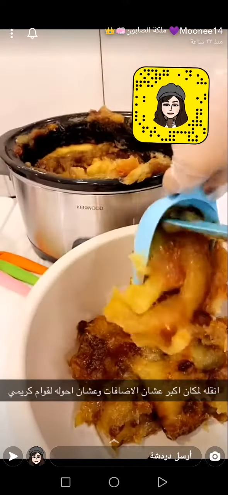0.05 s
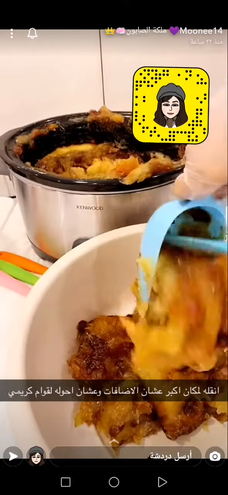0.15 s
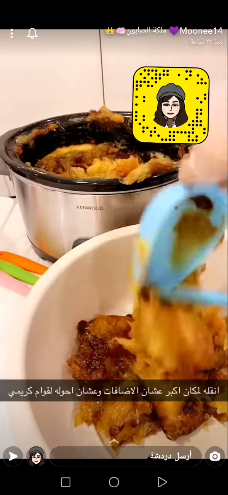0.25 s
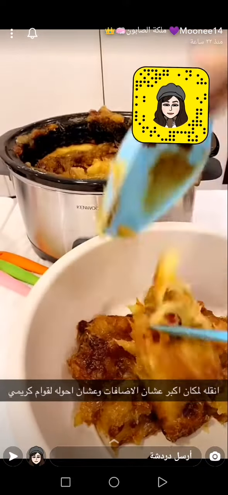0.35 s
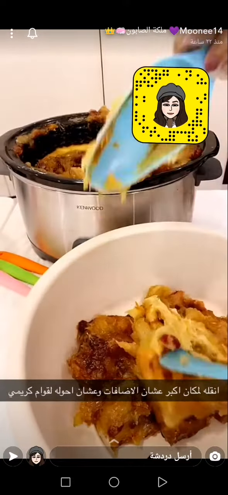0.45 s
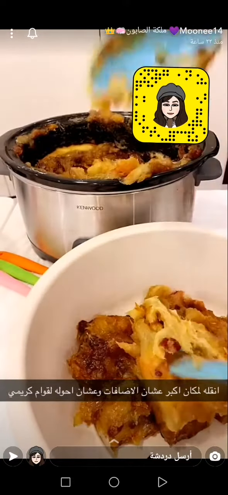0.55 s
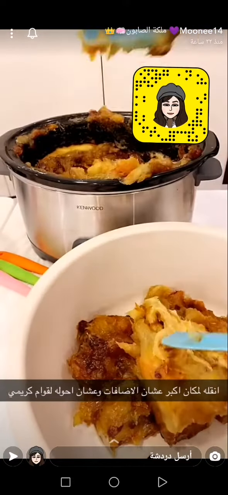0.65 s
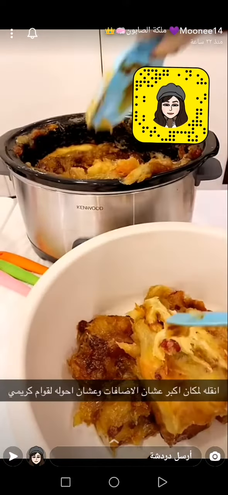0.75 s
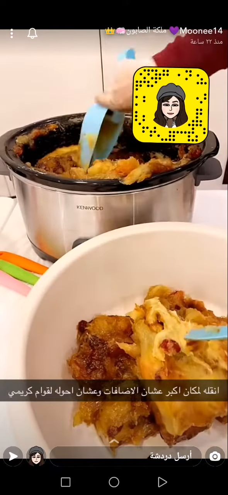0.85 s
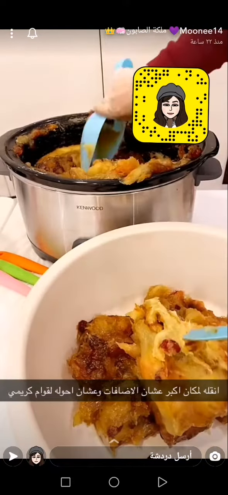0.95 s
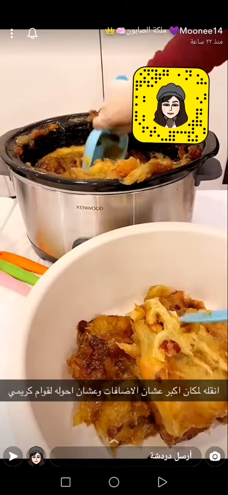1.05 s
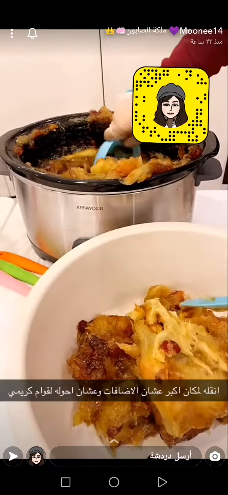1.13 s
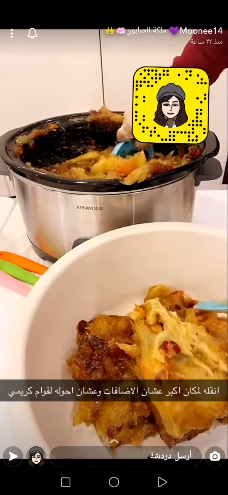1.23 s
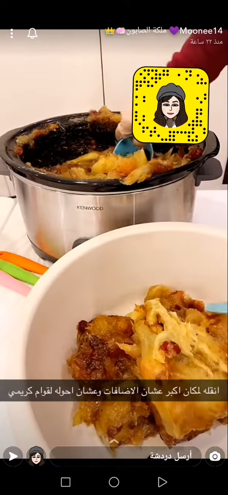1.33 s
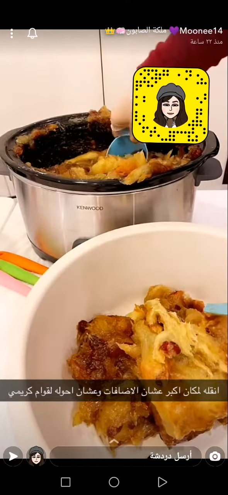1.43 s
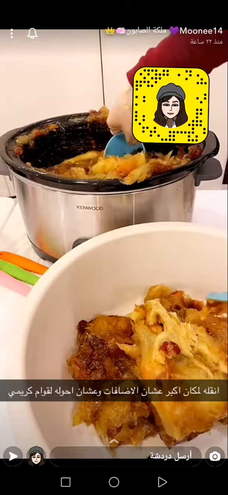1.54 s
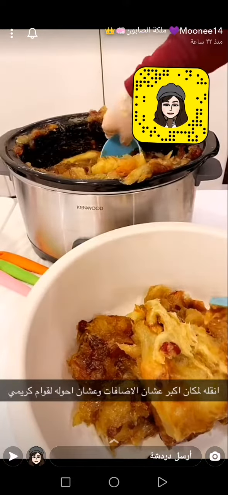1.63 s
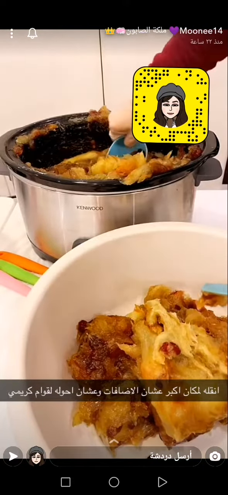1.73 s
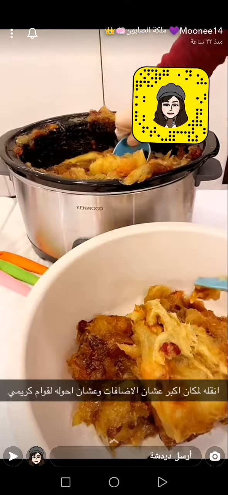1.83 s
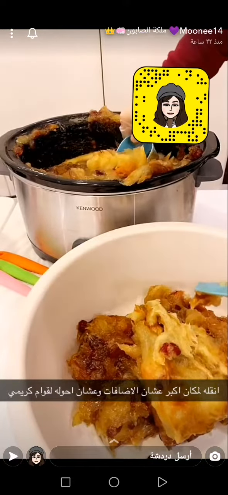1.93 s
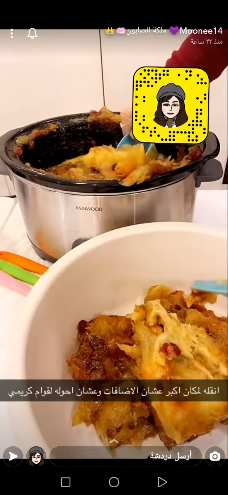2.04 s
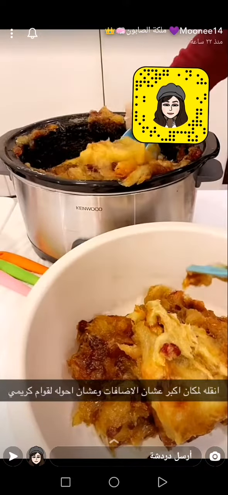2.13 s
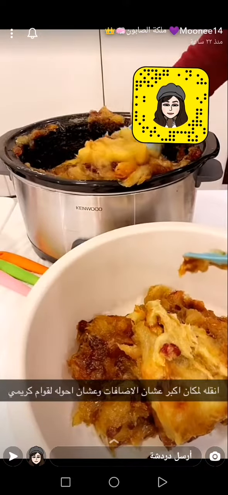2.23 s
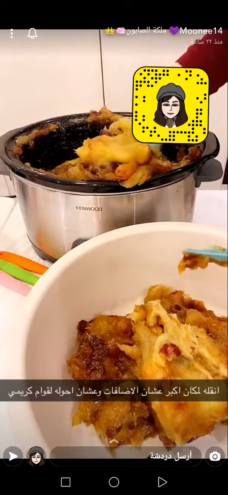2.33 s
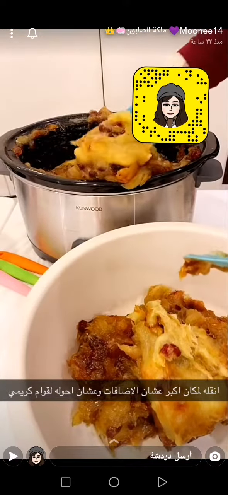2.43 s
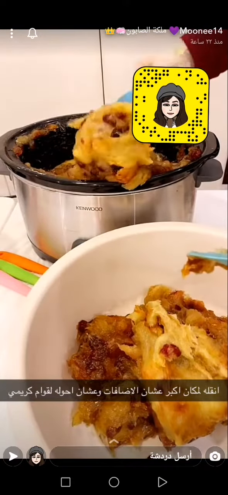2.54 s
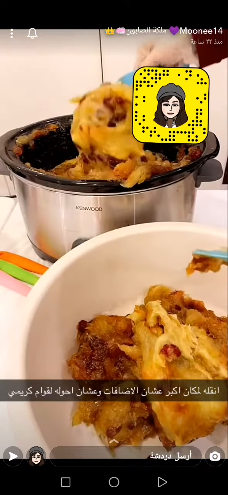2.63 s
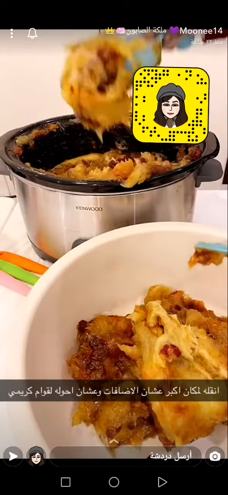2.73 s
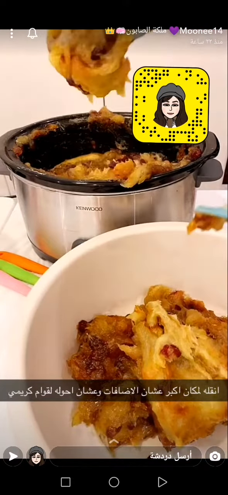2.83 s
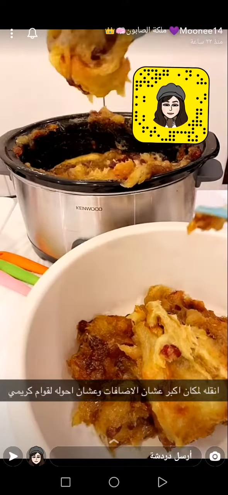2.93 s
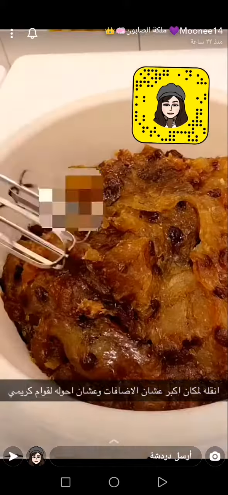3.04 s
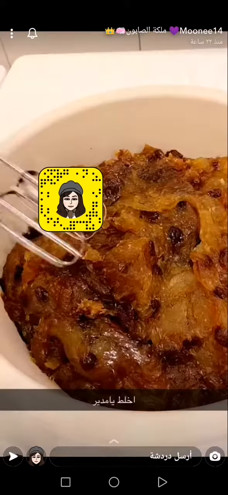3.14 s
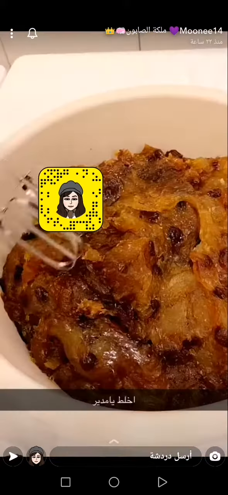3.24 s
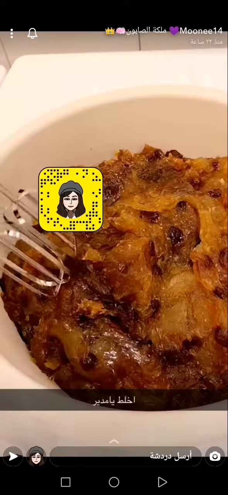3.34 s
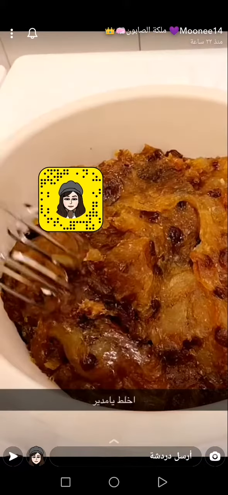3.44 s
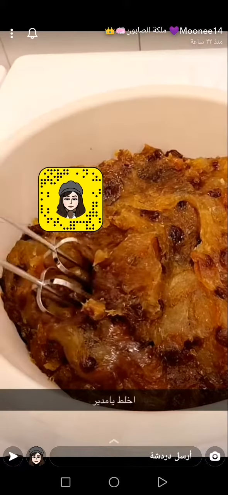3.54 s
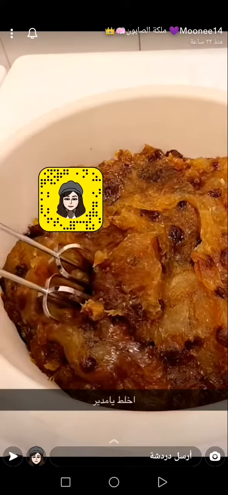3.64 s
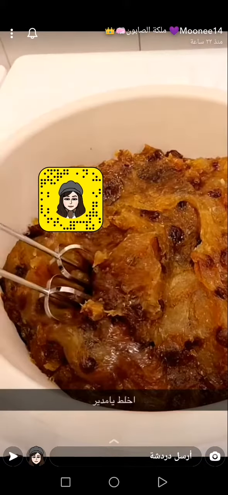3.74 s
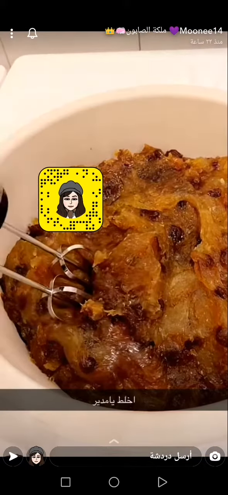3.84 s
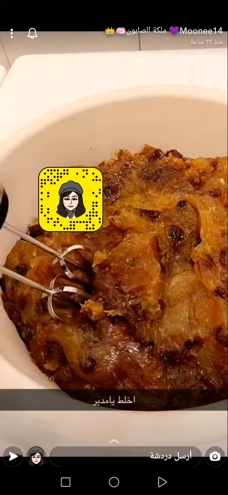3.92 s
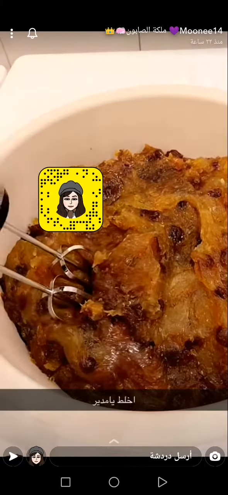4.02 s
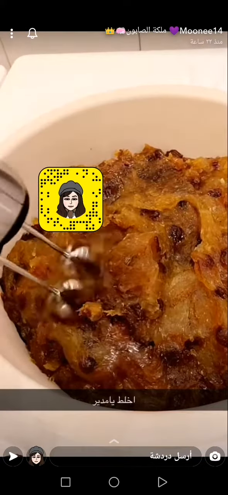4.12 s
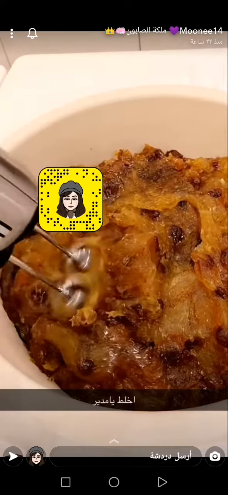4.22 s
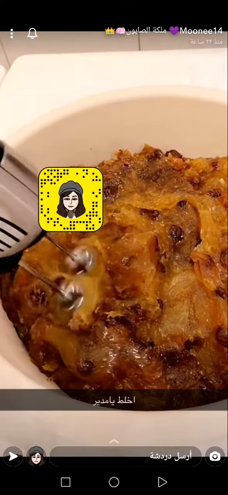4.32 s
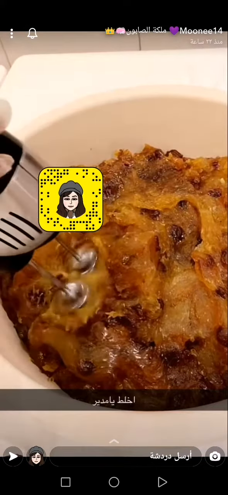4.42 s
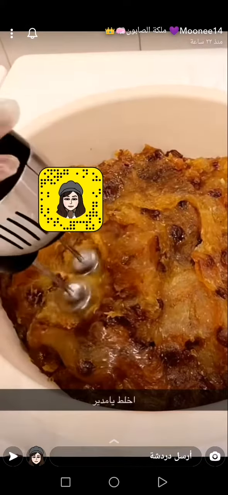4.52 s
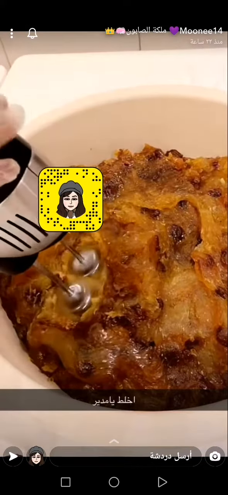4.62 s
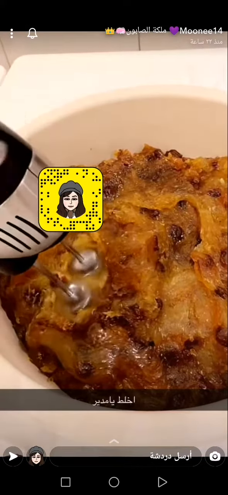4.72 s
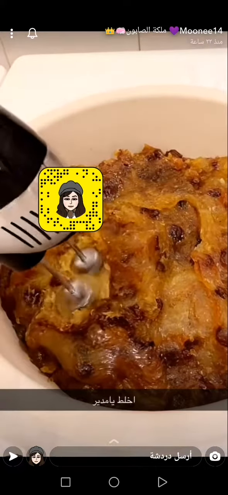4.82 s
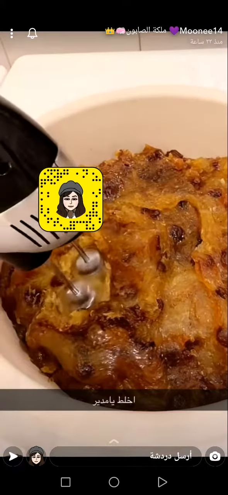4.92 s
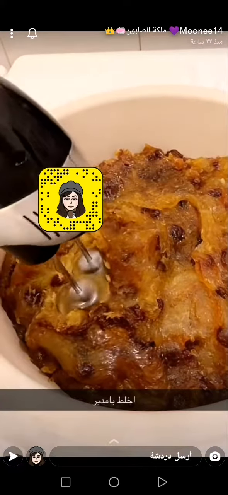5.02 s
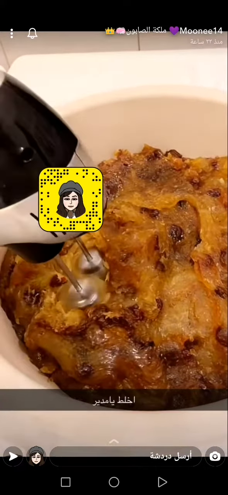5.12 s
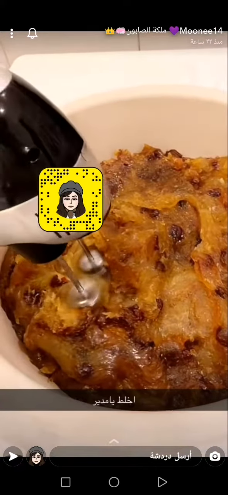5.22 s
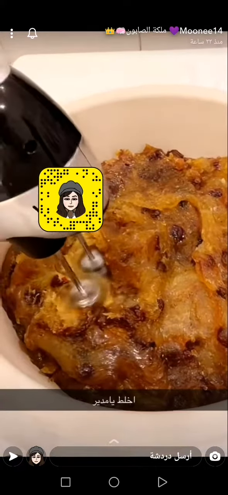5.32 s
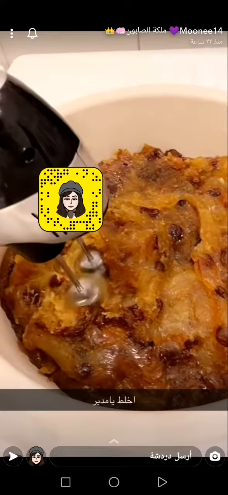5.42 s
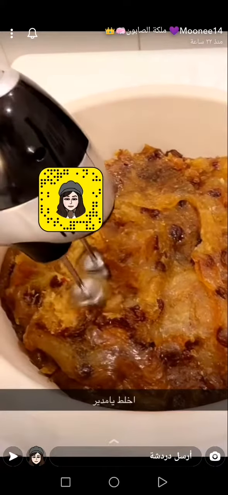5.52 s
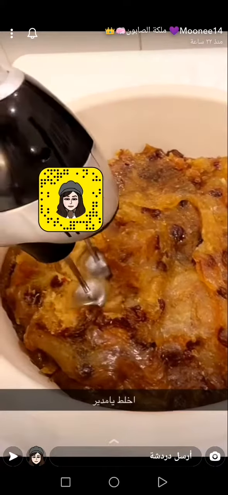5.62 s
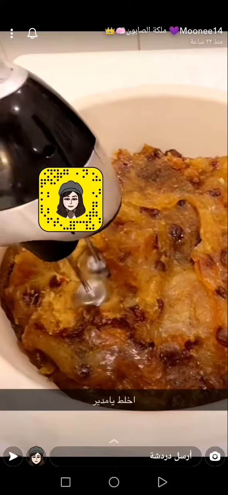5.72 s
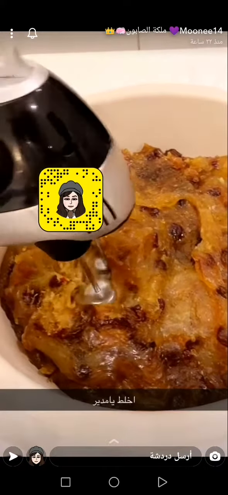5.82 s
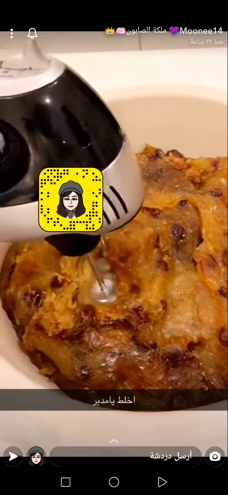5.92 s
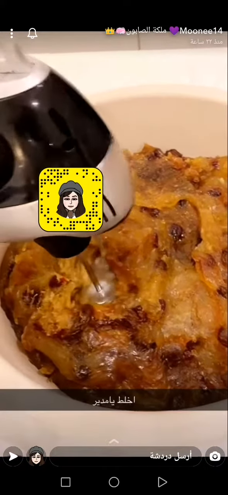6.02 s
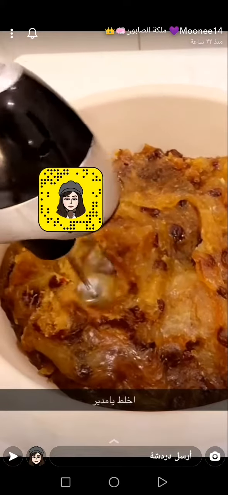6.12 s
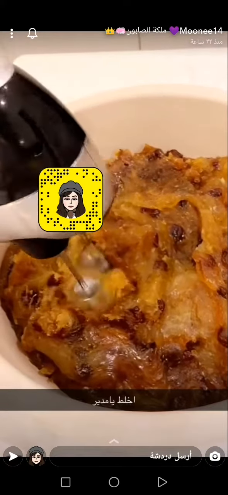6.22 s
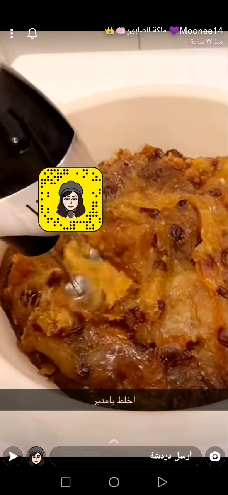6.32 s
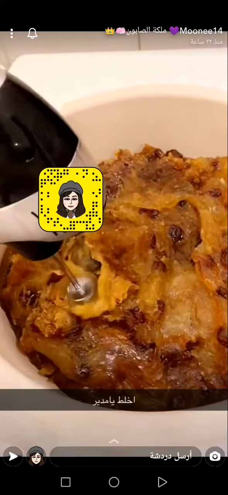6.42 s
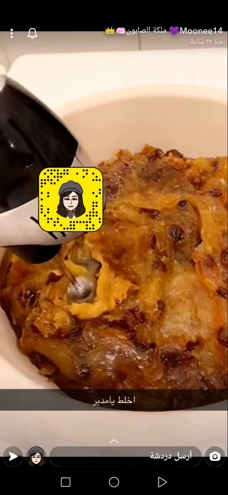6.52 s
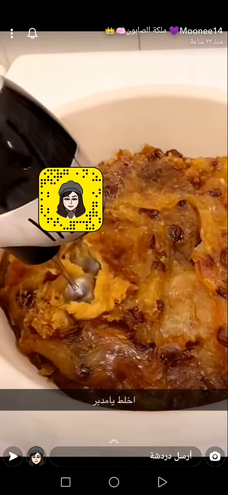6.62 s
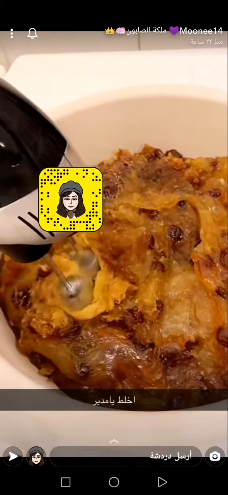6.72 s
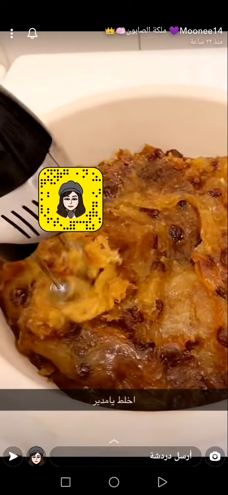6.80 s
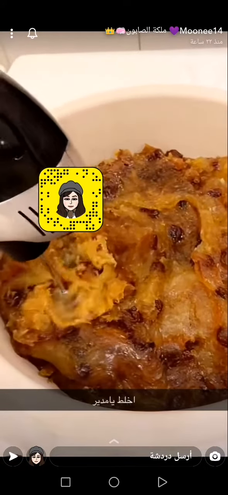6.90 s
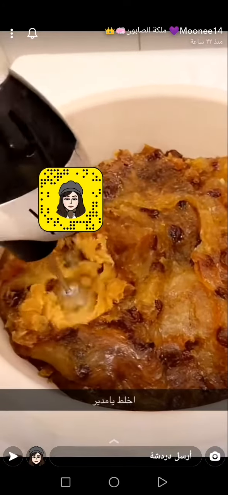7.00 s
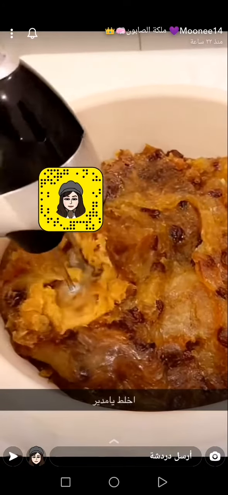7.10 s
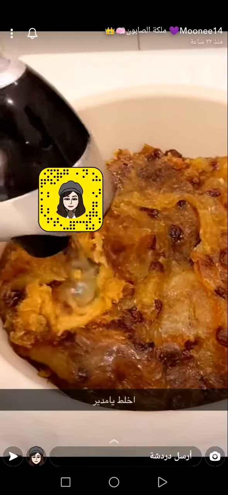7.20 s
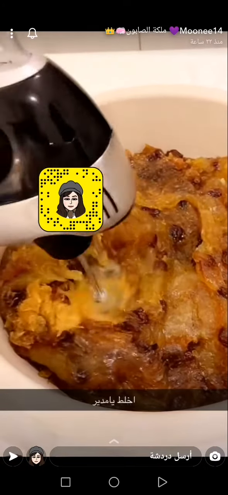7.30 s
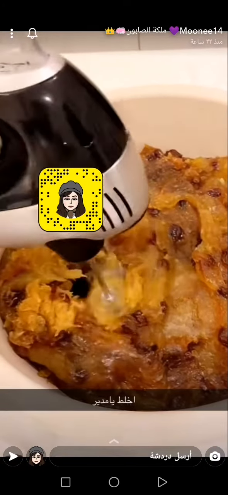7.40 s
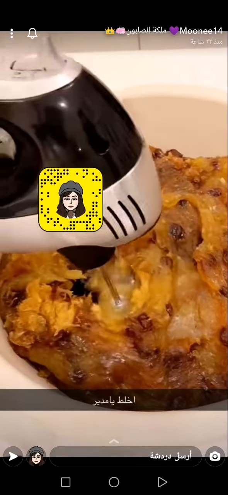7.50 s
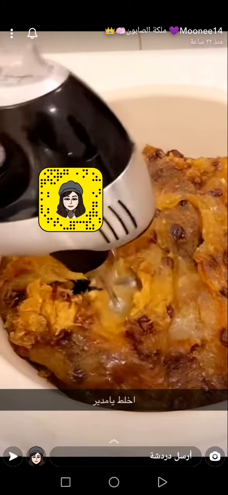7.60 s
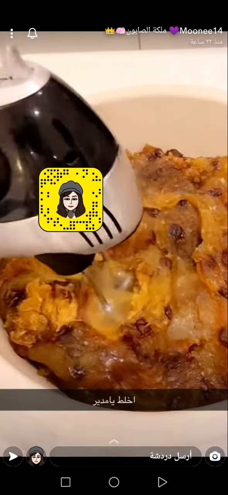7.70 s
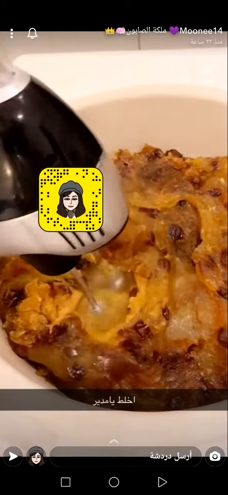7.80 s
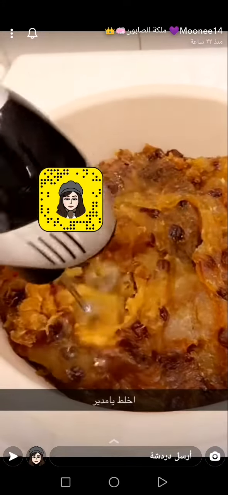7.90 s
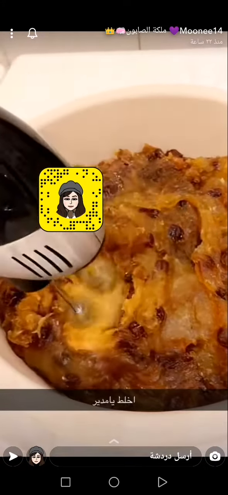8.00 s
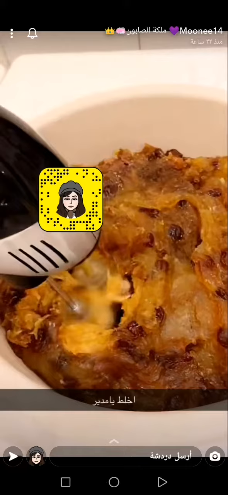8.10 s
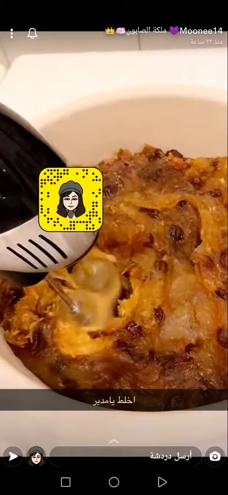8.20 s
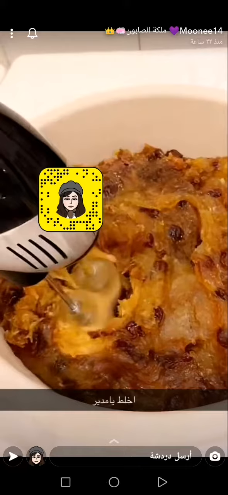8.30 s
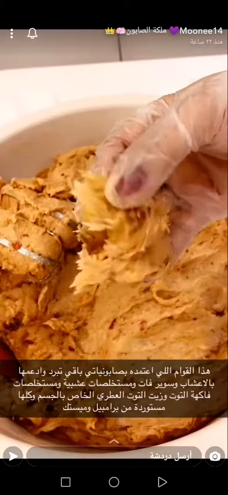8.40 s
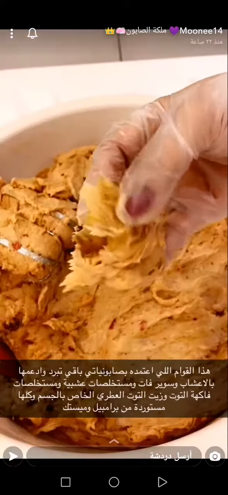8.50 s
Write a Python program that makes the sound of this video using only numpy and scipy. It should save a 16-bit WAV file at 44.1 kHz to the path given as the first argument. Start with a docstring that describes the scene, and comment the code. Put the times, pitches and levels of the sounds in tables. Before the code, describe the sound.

Soft sticky scrapes and light taps come from a scoop digging paste out of a pot, over low kitchen hum. The sound drops out for a moment, a few taps follow, and a much louder electric hand mixer starts with a rising whine. It churns thick paste in a bowl for about four seconds, wavering in pitch with rushing air and wet slaps, and stops suddenly. The sound is close and mono.

```python
"""A quietly humming kitchen, one mono microphone by the worktop. First a plastic scoop digs soft soap
paste out of a pot, scraping and tapping; an edit cut leaves a short silence at 3.1 s. At 4.3 s an
electric hand mixer starts, steps up to its high setting and beats the paste in a bowl. The motor's slot
whine throbs with the mains and sags under load, over fan rush, bowl rumble and squelching paste.
At 8.4 s a second cut leaves another short silence, then comes a last instant of room tone."""
import sys
import numpy as np
from scipy import signal
from scipy.fft import rfft, irfft, next_fast_len
from scipy.io import wavfile
from scipy.ndimage import uniform_filter1d

SR = 44100
rng = np.random.default_rng(int(sys.argv[2]) if len(sys.argv) > 2 else 0)


def master(y):
    """Save y as 16-bit WAV."""
    cut = np.clip(np.atleast_2d(y).T, -1, 1)
    pcm = np.round(cut * 32767)  # scale
    wavfile.write(sys.argv[1], SR, pcm.astype(np.int16))


N = 377055
TIME = np.arange(N) / SR

# stretches of sound between the edit cuts: (from [s], to [s])
HEARD_SPANS = [(-1, 3.080), (3.200, 8.384), (8.519, 9)]
# ventilation rumble behind everything: (frequency [Hz], relative level [dB])
ROOM_SPECTRUM = [(15, -41), (45, -22), (80, -6.5), (137, -5.5), (242, -1.5), (301, -7), (394, -6),
                 (531, -12.5), (641, -12.5), (1160, -20), (1480, -20.5), (1840, -24), (2050, -21),
                 (3820, -28.5), (12200, -32), (16000, -34)]
# hum of the kitchen: (frequency [Hz], level [dB], width [Hz])
HUM_LINES = [(132.6, -62, 5.4), (188, -69, 4.8), (356, -71, 3.2), (398, -70.5, 12), (624, -80, 4.9)]
# a low drone comes and goes: (from [s], to [s], level [dB])
DRONE_SPELLS = [(-.1, .52, -61.5), (1.05, 1.7, -57), (2.26, 2.944, -58), (3.203, 4.093, -57.5)]
# taps of scoop, beaters and switch: (time [s], relative level [dB], ring [Hz], t60 [s],
# treble tilt [dB/octave], ring against burst [dB])
TAPS = [(.116, -55, 3000, .06, 0.5, -9), (.335, -58.5, 2400, 0.18, 4, 2.5),
        (.514, -50.5, 1430, 0.076, 1, -4), (.519, -36, 9200, 0.01, 15, -16),
        (.657, -54.5, 7000, .045, 7, -15), (1.903, -66, 2250, 0.22, -4, 6), (2.028, -64.5, 3140, .14, 0, 5),
        (3.252, -55, 9000, 0.028, 6, -6), (3.517, -55.5, 800, 0.042, -1, 0),
        (3.697, -41, 11200, 0.0076, 7.5, -9), (3.819, -45, 1540, 0.029, -1.5, 0),
        (3.988, -47, 4500, 0.023, 4, -6), (4.241, -50.5, 6600, 0.015, 3, -6),
        (4.261, -30, 2320, 0.025, 1, 0), (4.268, -44.5, 487, 0.041, -9, 12.5),
        (4.282, -32, 3940, .025, -7.5, 5.5), (4.494, -34, 2500, 0.023, -1, 6),
        (4.518, -35.5, 2500, .025, -1, 11), (4.565, -30, 2460, .025, -2, 5)]
# a knock, or a slap of paste: (frequency [Hz], relative level [dB])
KNOCK_SPECTRUM = [(40, -44.5), (200, -16), (700, 3.5), (1400, -1), (2500, 3), (5000, -0.5), (9000, -6.5),
                  (16000, -16)]
# pushes of the scoop: (time [s], scrape level [dB], rise [s], fall [s], smear against scrape [dB])
SCOOP_STROKES = [(.02, -66, .03, 0.073, -1), (.27, -65.5, 0.017, 0.027, 8), (.375, -56, 0.037, 0.033, 6.5),
                 (.53, -62, .008, .025, -4), (.81, -61.5, 0.036, 0.026, -1), (.87, -61.5, 0.012, .04, -4),
                 (1.09, -54, 0.074, 0.062, -3), (1.26, -58, 0.086, 0.18, -1),
                 (1.55, -59.5, 0.087, 0.039, -2), (1.72, -65, 0.042, 0.077, 1),
                 (1.915, -66, .008, .03, -14), (2.04, -59.5, 0.022, 0.04, -10),
                 (2.135, -55.5, .02, 0.015, 0.5), (2.26, -61.5, 0.11, 0.089, -6),
                 (2.43, -61, .015, 0.1, -7), (2.66, -64, 0.11, .06, 1), (2.72, -59, .008, .02, -4),
                 (2.88, -68.5, 0.05, 0.11, 2)]
# plastic scraping inside the pot: (frequency [Hz], relative level [dB])
SCRAPE_SPECTRUM = [(290, -30), (500, 3), (668, -12), (960, 1), (1360, -1), (3290, 0.5), (12000, -17.5),
                   (16000, -16)]
# wet paste smearing: (frequency [Hz], relative level [dB])
SMEAR_SPECTRUM = [(2500, -27), (5000, 1.5), (8000, 1), (15500, -0.5)]
# rumble of the bowl: (frequency [Hz], relative level [dB])
BOWL_SPECTRUM = [(30, -41), (60, -30.5), (90, 0.5), (120, -4), (155, 3), (183, 2), (210, 3.5), (250, -0.5),
                 (310, -12), (500, -25.5)]
# that rumble at the microphone: (time [s], level [dB])
RUMBLE_LEVELS = [(4.4, -54), (4.61, -42.5), (4.93, -48), (5.98, -39), (6.38, -46), (6.65, -40),
                 (6.68, -47.5), (7.69, -41), (7.88, -53), (7.94, -42), (7.97, -49), (8.36, -46)]
# rush of the motor's fan: (frequency [Hz], relative level [dB])
FAN_SPECTRUM = [(40, -40), (250, -11), (310, -10), (380, 0.5), (700, -0.5), (1300, -3), (2500, -3),
                (3300, 3.5), (4300, -3.5), (5400, 1.5), (6300, -6), (8000, -30)]
# resonances of the mixer's shell and vents: (frequency [Hz], width [Hz], gain [dB])
SHELL_MODES = [(849, 55, -9), (1013, 21, -1), (1158, 8.7, 4.5), (1297, 82, -11), (1549, 43, -5),
               (1722, 19, -5.5), (2290, 36, -4.5), (2337, 20, -22), (2905, 56, -16), (3072, 23, 1),
               (3195, 63, 1.5), (3325, 37, 3.5), (3610, 130, -0.5), (3807, 96, 2), (3909, 34, 4.5),
               (4285, 90, -3.5), (4610, 120, -1.5), (4910, 73, -1)]
# hiss of the sparking brushes: (frequency [Hz], relative level [dB])
BRUSH_SPECTRUM = [(4000, -14), (6500, -12), (7300, -0.5), (8300, -1), (9200, 0.5), (9800, -3),
                  (10600, -2.5), (11500, -8.5), (12600, -3.5), (14400, -8), (15700, -3.5)]
# tones of the turning rotor: (multiple of its speed, relative level [dB])
ROTOR_ORDERS = [(2, -15), (4, -21), (7, -8), (8, -18.5), (9, -5.5), (21, -27)]
# buzz of the field coils at full current: (multiple of the mains, level [dB])
COIL_BUZZ = [(2, -52.5), (4, -51.5), (6, -51)]
# the switch's low and high settings: (time [s], speed gained [turns/s], time constant [s])
SPEED_STEPS = [(4.236, 358.69, 0.112), (4.512, 113.178, 0.18)]
# the beaters dig into the paste: (time [s], speed lost [turns/s], digging in [s], coming free [s])
BEATER_DIGS = [(5.009, 35.3, 0.402, 0.666), (5.755, 23.5, 0.329, 0.334), (6.055, 30.5, 0.175, 0.224),
               (6.495, 26.2, 0.183, 0.549), (6.946, 26.7, 0.1, 0.241), (7.499, 36.6, 0.111, 0.129),
               (7.68, 32.1, 0.109, 0.186), (8.119, 25.2, 0.125, 0.293)]
# resonances that radiate the whine: (frequency [Hz], width [Hz], gain [dB])
STATOR_MODES = [(5148, 160, 0), (5352, 165, -2), (5500, 95, -3), (5668, 90, -3.5)]
# high-setting whine at the microphone, as the mixer is moved about: (time [s], level [dB])
WHINE_LEVELS = [(4.62, -41), (4.74, -32), (5.0, -27), (5.04, -30.5), (5.56, -25), (6.2, -23.5), (6.3, -29),
                (6.58, -25.5), (6.88, -28.5), (6.95, -34.5), (7.0, -29.5), (7.35, -29.5), (7.43, -25.5),
                (7.63, -33.5), (7.72, -29.5), (7.79, -31.5), (8.36, -31)]

MAINS_HZ, DRONE_HZ, CUTOFF_HZ = 60.0325, 231, 15800
SWITCH_ON_S, SWITCH_OFF_S, HANDOVER_S, DRONE_FADE_S = 4.276, 8.39, .09, .083
WORKING_SPEED, SHAKE_SPEED, SHAKE_HALF_WIDTH = 435, 431, 5.2  # turns per s
ROTOR_SLOTS, GEAR_RATIO = 12, 18
SURGE_DB, SURGE_HOLD_S, SURGE_FALL_DB_PER_S, LOW_SETTING_DB = -35, .044, 300, -39


def from_db(db):
    """Decibels to gain."""
    return 10 ** (np.asarray(db) / 20)


def rms_one(x):
    """Scale to rms 1."""
    return x / np.sqrt(np.mean(x ** 2) + 1e-20)


def even(x, size=2205):
    """Hold the rms over `size` samples at 1."""
    return x / np.sqrt(np.abs(uniform_filter1d(x * x, size)) + 1e-12)


def curve(points):
    """Join (time [s], value) points at every sample."""
    return np.interp(TIME, *np.transpose(points))


def swell(s, rise_s, fall_s):
    """An envelope that grows to 1 at time s and dies away."""
    return np.exp(-np.abs(TIME - s) / np.where(TIME < s, rise_s, fall_s))


def noise(size=N):
    """White noise."""
    return rng.standard_normal(size)


def drift(rate_hz):
    """A smooth random wander with spread 1."""
    step = 40  # samples
    r = np.exp(-2 * np.pi * step * rate_hz / SR)
    slow = signal.lfilter([1], [1, -2 * r, r * r], noise(N // step + 2002))[2000:]
    return np.interp(np.arange(N) / step, np.arange(len(slow)), rms_one(slow))


def grains(per_s, spread_db):
    """Random clicks of uneven size; rms 1."""
    sizes = from_db(spread_db * np.minimum(rng.exponential(1, N), 4)) * rng.choice([-1, 1], N)
    return rms_one(sizes * (rng.random(N) < per_s / SR))


def colour(x, spectrum):
    """Shape a sound by (frequency [Hz], level [dB]) points; rms 1."""
    hz, db = np.transpose(spectrum)
    size = next_fast_len(len(x))
    bins = np.maximum(np.fft.rfftfreq(size, 1 / SR), 1)
    gain = from_db(np.interp(np.log(bins), np.log(hz), db))
    return rms_one(irfft(rfft(x, size) * gain, size)[:len(x)])


def resonate(x, modes):
    """Parallel resonances (frequency [Hz], width [Hz], gain [dB]) of alternating sign."""
    out = 0
    for k, (hz, width, db) in enumerate(modes):
        r = np.exp(-np.pi * width / SR)
        poles = [1, -2 * r * np.cos(2 * np.pi * hz / SR), r * r]
        out = out + (-1) ** k * from_db(db) * (1 - r * r) / 2 * signal.lfilter([1, 0, -1], poles, x)
    return out


def kitchen(x, wet_db, t60):
    """The microphone hears the direct sound, then dense reflections from worktop and tiles."""
    age = TIME[:SR // 3]
    tail = noise(len(age)) * from_db(-60 * age / t60) * (age > .002)
    return x + from_db(wet_db) * signal.fftconvolve(x, tail / np.linalg.norm(tail))[:N]


def room_tone():
    """The background of the place: ventilation rumble, wavering hum lines and a drone."""
    hum = 0
    for hz, db, width in HUM_LINES:
        phase = 2 * np.pi * hz * TIME
        hum += from_db(db) * (drift(width) * np.cos(phase) + drift(width) * np.sin(phase))
    level = sum(from_db(db) * np.clip(.5 + np.minimum(TIME - start, end - TIME) / DRONE_FADE_S, 0, 1)
                for start, end, db in DRONE_SPELLS)
    drone = level * np.sin(2 * np.pi * DRONE_HZ * TIME + .5 * drift(1.7))
    return hum + drone + from_db(-59) * colour(noise(), ROOM_SPECTRUM)


def taps():
    """Each contact is a short damped burst with one ringing band, and the room answers."""
    out, age = np.zeros(N), TIME[:SR // 4]
    for s, db, hz, t60, tilt_db, ring_db in TAPS:
        tilted = [(f, level + tilt_db * np.log2(f)) for f, level in KNOCK_SPECTRUM]
        burst = colour(noise(len(age)), tilted)
        ring = rms_one(resonate(noise(len(age)), [(hz, .1 * hz, 0)]))
        attack = 1 - np.exp(-age / (.016 * t60))  # soft contacts also start slowly
        decay = from_db(db + 1.5 - 60 * age / t60)
        at = round(s * SR)
        out[at:at + len(age)] += attack * decay * (burst + from_db(ring_db) * ring)
    return kitchen(out, wet_db=-5.5, t60=.18)


def squelches(per_s, spread_db, q, count=16):
    """Small air pockets burst in the paste, each ringing briefly at one of `count` pitches; rms 1."""
    pops, pitch_index = grains(per_s, spread_db), rng.integers(0, count, N)
    return rms_one(sum(resonate(pops * (pitch_index == k) + 1e-18, [(hz, hz / q, 0)]) / np.sqrt(hz)
                       for k, hz in enumerate(np.geomspace(950, 5200, count))))


def scoop():
    """Sticky paste tears in tiny clicks and wet pops as plastic slides through it in the hollow pot."""
    pushes = [(from_db(db) * swell(s, rise, fall), from_db(smear_db))
              for s, db, rise, fall, smear_db in SCOOP_STROKES]
    scrape_level = np.sqrt(sum(push ** 2 for push, _ in pushes))
    smear_level = np.sqrt(sum((push * wet) ** 2 for push, wet in pushes))
    scrape = colour(noise() + .9 * grains(per_s=350, spread_db=3.5), SCRAPE_SPECTRUM)
    pops = .7 * squelches(per_s=260, spread_db=2, q=14)
    scrape = even(kitchen(scrape + pops, wet_db=-2.5, t60=.046), size=4410)
    smear = colour(noise() + .9 * grains(per_s=600, spread_db=4), SMEAR_SPECTRUM)
    return (scrape_level * scrape + smear_level * smear) * (TIME < HEARD_SPANS[0][1])


def bowl_rumble(pace, blades):
    """The beaters churn the bowl in pulses; its lowest mode booms more as they speed up."""
    boom = even(resonate(resonate(noise(), [(183, 12, 0)]), [(183, 24, 0)]), size=11025)
    churn = colour(noise(), BOWL_SPECTRUM) + pace ** 4 * boom
    return from_db(curve(RUMBLE_LEVELS) + 2.2 * blades) * even(churn, size=4410)


def paste_slaps(blades):
    """The blades slap the paste: dense clicks that swell on each turn."""
    return colour(grains(per_s=700, spread_db=8.5), KNOCK_SPECTRUM) * from_db(blades)


def fan_and_gears(pace):
    """Fan air, and gear rattle through shell resonances that swell and fade as the mixer is moved."""
    gears = noise() + .78 * grains(per_s=450, spread_db=2.5)
    shell = rms_one(sum((-1) ** k * resonate(gears, [mode]) * from_db(2.1 * drift(2.1))
                        for k, mode in enumerate(SHELL_MODES)))
    return colour(noise(), FAN_SPECTRUM) + from_db(2) * np.minimum(pace, 1) ** 2 * shell


def brush_hiss(pace):
    """The brushes spark and hiss, growing steeply with speed."""
    sparks = colour(noise() + .5 * grains(per_s=2500, spread_db=4), BRUSH_SPECTRUM)
    return from_db(-36.5) * pace ** 2.2 * rms_one(kitchen(sparks, wet_db=-4.5, t60=.025))


def motor_speed():
    """Turns per s: the run-up to each setting, less the drag of the paste."""
    free = sum(gain * (1 - np.exp(-np.maximum(TIME - s, 0) / lag)) for s, gain, lag in SPEED_STEPS)
    drag = sum(loss * np.exp(-((TIME - s) / np.where(TIME < s, dig, release)) ** 2)
               for s, loss, dig, release in BEATER_DIGS)
    return np.maximum(free - drag, 1)


def mains_throb(width, rest, lead_s=0):
    """The magnetic pull peaks twice in each mains cycle and keeps a remainder in between."""
    return rest + np.exp(-(np.sin(2 * np.pi * MAINS_HZ * (TIME + lead_s)) / width) ** 2)


def motor_hum(angle, speed, whine_db):
    """The coils buzz with the mains; the unbalanced rotor shakes the housing, most near one speed."""
    current_db = np.interp(speed, [200, 420, 450], [0, -4.5, -7])  # a faster rotor draws less current
    coils = sum(from_db(db + current_db + 2 * drift(5)) * np.sin(2 * np.pi * MAINS_HZ * order * TIME)
                for order, db in COIL_BUZZ)
    shake = from_db(whine_db - 20) / np.hypot(1, (speed - SHAKE_SPEED) / SHAKE_HALF_WIDTH)
    return np.sqrt(2) * (shake * np.sin(angle + .15 * drift(15)) + coils)


def rotor_tones(angle, speed):
    """Unbalance and fan blades give wavering multiples of the speed, the upper ones mains-pulsed."""
    throb, out = rms_one(mains_throb(width=.19, rest=.39)), 0
    for order, db in ROTOR_ORDERS:
        pulse = np.roll(throb, rng.integers(SR // 120)) if order > 2 else 1
        out += from_db(db + 3 * drift(9.6)) * pulse * np.sin(order * angle + .64 * drift(25))
    # they meet the shell's resonances best at the usual working speed
    return out * from_db(np.interp(speed, [400, 426, 441, 456], [-7, 0, 0, -8]))


def gear_growl(speed, pull):
    """Each magnetic pull shakes the loose gears until the motor is up to speed."""
    band = [(1800, 1500, 0)]
    rattle = rms_one(pull * resonate(resonate(noise(), band), band))
    return from_db(np.interp(speed, [140, 250, 400], [-2, -10, -28])) * rattle


def whine_level(whine_db):
    """A surge of current dies away at switch-on; the low setting then hands over to the high one."""
    surge = from_db(SURGE_DB - SURGE_FALL_DB_PER_S * np.maximum(TIME - SWITCH_ON_S - SURGE_HOLD_S, 0))
    high = np.clip((TIME - SPEED_STEPS[1][0]) / HANDOVER_S, 0, 1)
    return surge + (1 - high) ** 2 * from_db(LOW_SETTING_DB) + high ** 2 * from_db(whine_db)


def slot_whine(angle, speed, blades, whine_db):
    """The rotor slots pass the poles; the mains splits their tone into a cluster of lines."""
    slow = np.interp(speed, [200, 410], [1, 0])
    racing = np.interp(speed, [440, 465], [0, 1])
    # running free of the paste, the rotor speeds up a little with each pull
    swing = (.1 + 1.3 * racing + .25 * drift(3)) * np.cos(4 * np.pi * MAINS_HZ * (TIME + .0026))
    chatter = (.2 + 1.25 * slow + .15 * racing) * drift(110)
    slot_tone = from_db(.8 * drift(60) + blades) * np.sin(ROTOR_SLOTS * angle + chatter - swing)
    pull = mains_throb(width=.5, rest=.25, lead_s=-.0015)
    ringing = resonate(mains_throb(width=.3, rest=.05, lead_s=.0016) * slot_tone, STATOR_MODES)
    # the bare tone is heard until it climbs into the stator's resonances
    bare = np.interp(speed, [378, 412], [1, 0])
    tone = even(kitchen(.5 * bare * pull * slot_tone + (1 - bare) * ringing, wet_db=-15, t60=.08))
    growl = gear_growl(speed, pull)
    # the octave above is stronger while the motor gathers speed
    octave_phase = 2 * ROTOR_SLOTS * angle + (.8 + .5 * slow) * drift(200)
    octave = even(mains_throb(width=.6, rest=.3) * np.sin(octave_phase))
    octave_db = np.interp(speed, [130, 190, 320, 360], [-50, -44.5, -44.5, -50]) + 2.4 * drift(9)
    return whine_level(whine_db) * (tone + growl) + from_db(octave_db) * octave


def mixer():
    """The hand mixer in the foreground: one motor drives fan, gears and the beaters in the bowl."""
    whine_db = curve(WHINE_LEVELS)
    speed = motor_speed() * (1 + .00089 * drift(12.3))  # lumps in the paste tug at the motor
    angle = 2 * np.pi * np.cumsum(speed) / SR
    pace = speed / WORKING_SPEED
    blades = np.sin(angle / GEAR_RATIO + 1.2 * drift(3.4))  # one cycle per turn of the beaters
    body = from_db(-34.5) * fan_and_gears(pace)
    body += from_db(-45.5) * paste_slaps(blades)
    body += from_db(-35) * rotor_tones(angle, speed)
    body *= np.minimum(pace, 1) ** 1.14  # all three build with the speed
    hiss = brush_hiss(pace)
    rumble = bowl_rumble(pace, blades)
    tones = slot_whine(angle, speed, blades, whine_db) + motor_hum(angle, speed, whine_db)
    running = np.clip((TIME - SWITCH_ON_S) / .0098, 0, 1) * (TIME < SWITCH_OFF_S)
    return running * (tones + body + hiss + rumble)


def scene():
    """Room and worktop in mono, alike on both channels; two edit cuts leave short silences."""
    heard = sum((TIME > start) & (TIME < end) for start, end in HEARD_SPANS)
    gate = uniform_filter1d(heard.astype(float), size=64)
    sound = (room_tone() + scoop() + taps() + mixer()) * gate
    return np.array([sound, sound])


def record(dry):
    """The top end is cut steeply."""
    return signal.sosfilt(signal.ellip(12, .1, 80, CUTOFF_HZ, fs=SR, output="sos"), dry)


dry = scene()
out = record(dry)
master(out)
```